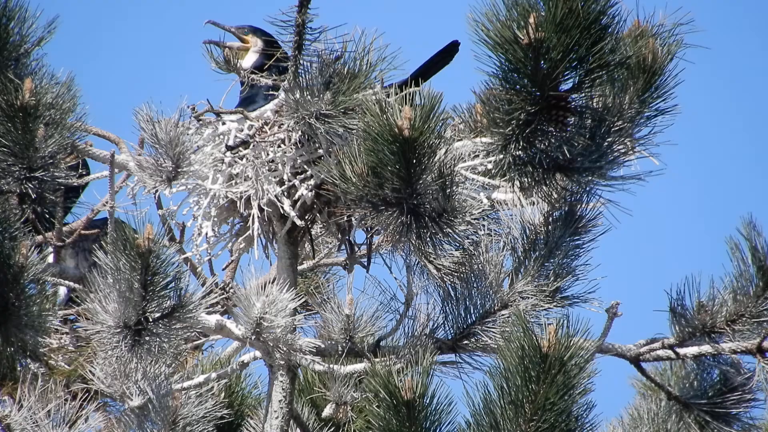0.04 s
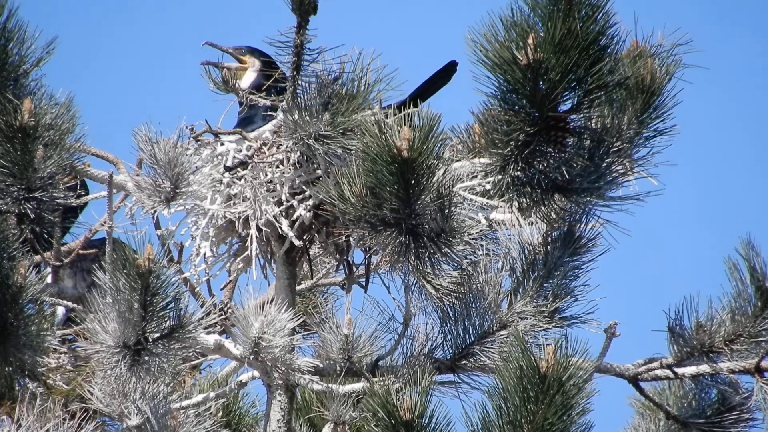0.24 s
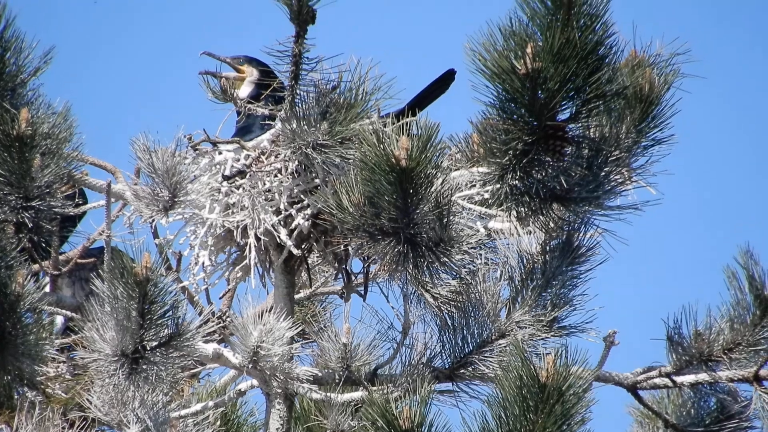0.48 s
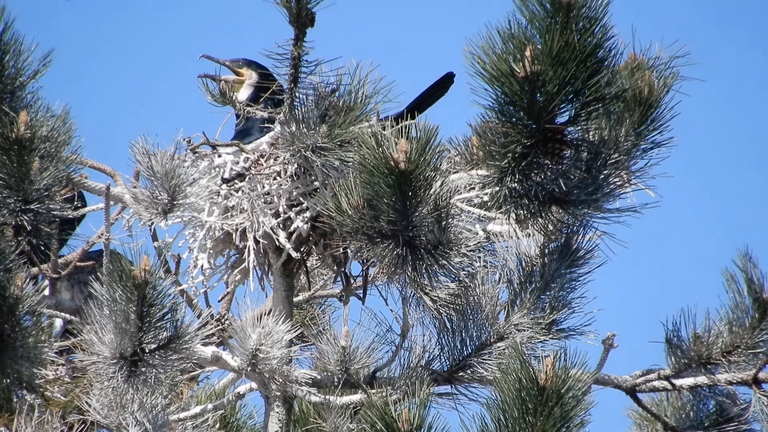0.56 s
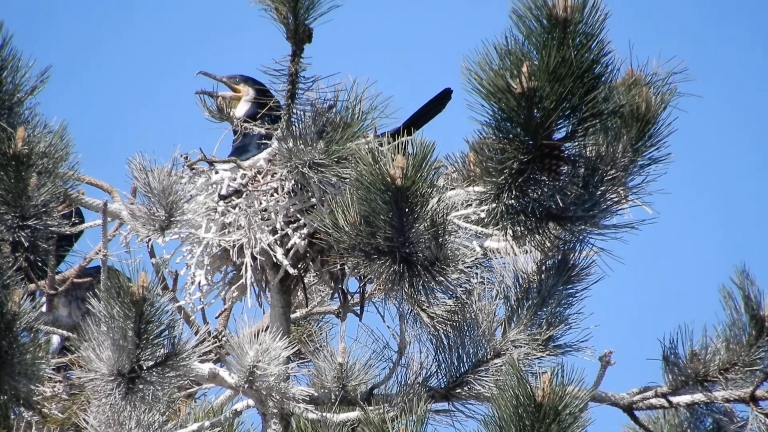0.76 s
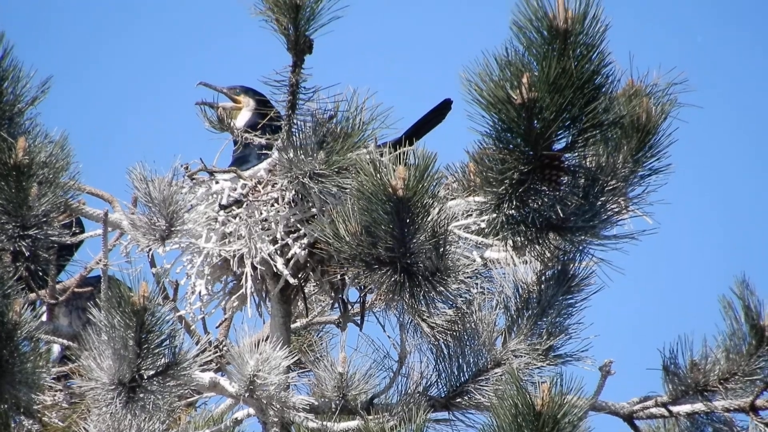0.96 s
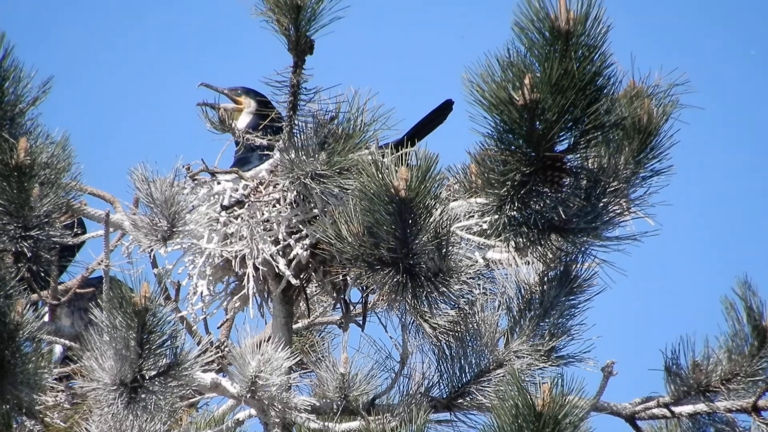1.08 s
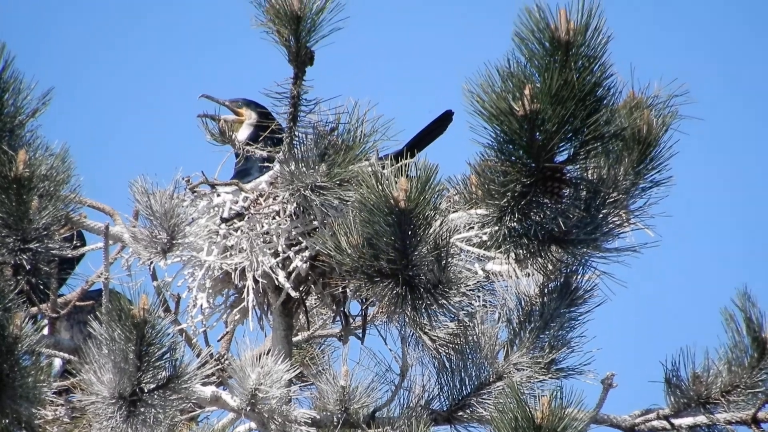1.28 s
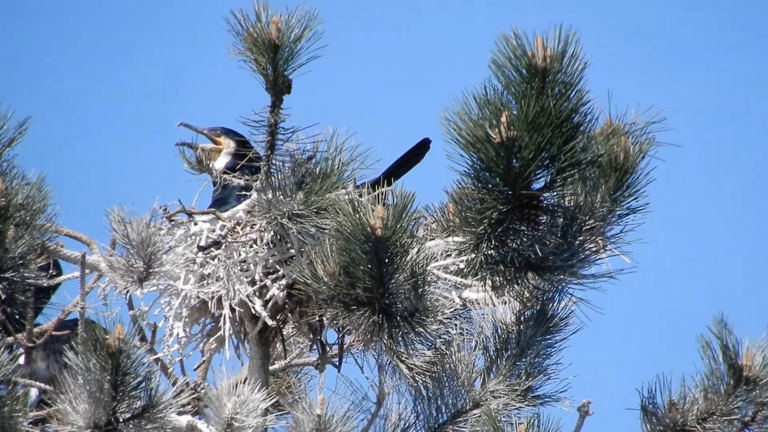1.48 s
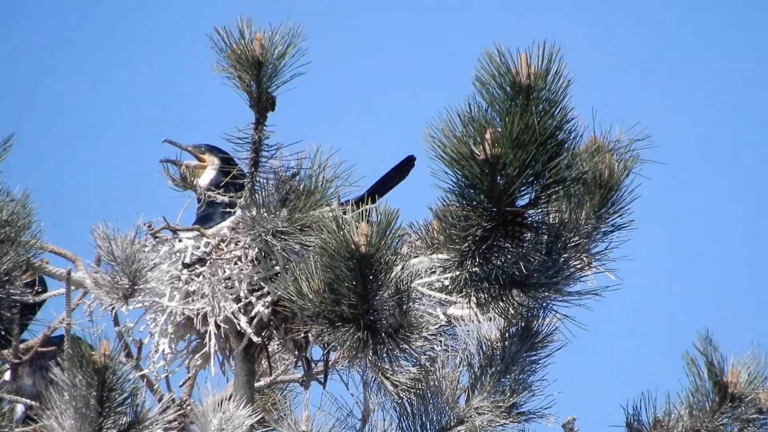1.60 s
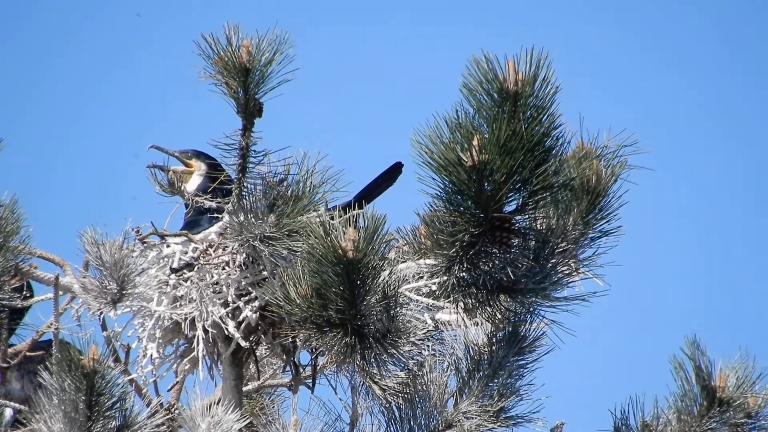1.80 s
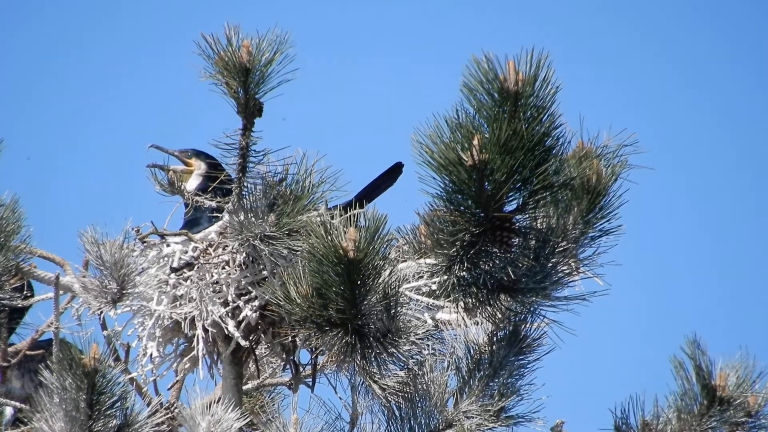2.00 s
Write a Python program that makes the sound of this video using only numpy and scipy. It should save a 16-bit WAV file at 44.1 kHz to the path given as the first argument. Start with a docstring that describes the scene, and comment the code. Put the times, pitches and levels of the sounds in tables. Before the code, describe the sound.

Large dark waterbird on a treetop nest gives a quick run of short, dry, raspy croaks, louder first, then fainter; loud low wind buffets the camera microphone throughout, with faint hiss, small handling ticks and late distant chirps.

```python
"""Treetop waterbird colony in a breeze, heard at the two ports of a camera microphone.
Rumble: frozen eddies swept past each port at changing speed, with sharp pressure puffs and a flutter.
Croaks: runs of short calls, uneven pulses and breath ringing a throat. Far whistles: gliding sines.
Ticks: a small struck body ringing in decaying modes. Throughout: a thin hiss of shaped noise
and narrow whining noise bands."""
import sys
import numpy as np
from scipy import signal
from scipy.fft import rfft, irfft
from scipy.io import wavfile
from scipy.ndimage import uniform_filter1d, map_coordinates

SR = 44100
rng = np.random.default_rng(int(sys.argv[2]) if len(sys.argv) > 2 else 0)


def rack_gain(trim_db):
    """Turn a fader trim in dB into the linear factor to multiply a signal by."""
    fader = np.asarray(trim_db, float)
    return 10 ** (fader / 20)


def file_out(sig):
    """Save sig as 16-bit WAV at sys.argv[1]."""
    # one column per channel
    cols = np.atleast_2d(sig).T
    # limit, then scale
    lim = np.clip(cols, -1, 1)
    pcm = np.round(lim * 32767).astype(np.int16)
    wavfile.write(sys.argv[1], SR, pcm)


N = 90184
TIME = np.arange(N) / SR
START_S = .1415   # the recorder opens

# hiss spectrum: hz, relative_db_per_hz
HISS_SPECTRUM = [(300, -9), (700, 7.5), (1000, 1.5), (1450, -9.5), (2000, -4), (3000, -10), (4200, -9.5),
                 (5000, -19), (7000, -23), (10000, -26), (14000, -32), (16000, -34)]
# left-right correlation of the hiss: hz, likeness_0_to_1
HISS_CORRELATION = [(1200, 0.3), (3000, .6), (6000, 0.45), (12000, .1)]
# breeze in the needles, only its changes count: time_s, level_db
NEEDLE_RUSTLE = [(0.33, -80), (0.952, -72), (1.068, -75.5), (1.26, -83), (1.496, -86.5), (1.678, -75),
                 (1.874, -75), (2.0, -77.5)]
HISS_DB, HISS_DRIFT_DB, HISS_DRIFT_HZ = -58, 1.8, 4.9
RUSTLE_FROM_HZ, RUSTLE_SHARE, RUSTLE_FLICKER_DB, RUSTLE_FLICKER_HZ = 2600, 0.62, 2.0, 20.0

# whining bands: hz, width_hz, level_db
WHINE_BANDS = [(977, 80, -67.5), (1250.5, 30, -74), (2480, 71, -73), (3410, 88, -84), (3874, 140, -67.5),
               (4820, 81, -86)]
WHINE_FLICKER_DB, WHINE_FLICKER_HZ, WHINE_LEFT_MINUS_RIGHT_DB = 2, 20, 1.5

# contacts on the small body: time_s, level_db, upper_mode_boost_db
TICK_CONTACTS = [(0.3833, -46, -19.5), (0.8443, -39.5, -16.5), (1.19, -47.5, -10.5), (1.5115, -36, 11),
                 (1.5192, -43, -12), (1.74, -68, 14.5), (1.811, -48, -36)]
# modes of the small body: hz, relative_db, t60_s
BODY_MODES = [(2010, -5.5, .005), (2525, -1, 0.0077), (3070, -2, 0.006), (4100, -3, 0.0092),
              (4890, 0, 0.0031), (5530, -5, 0.003), (6660, -8.5, 0.0058), (8130, 1.5, 0.0039),
              (10500, -14.5, 0.0023)]
BRIGHT_FROM_HZ, TICK_TOP_HZ, TICK_SPREAD_DB = 4300, 11500, 1.5
CONTACT_WIDTH_SHARE, LEFT_LAG_SAMPLES = 0.31, 0.53   # contact bandwidth as a share of mode pitch

# far whistles: start_s, length_s, end_level_db, start_pitch_hz, glide_hz_per_s
FAR_WHISTLES = [(1.606, 0.065, -81, 7330, -5000), (1.826, .08, -64.5, 4530, -2200),
                (1.978, 0.0095, -54.5, 2950, -500), (1.994, 0.033, -67, 3000, 498.5),
                (.372, .014, -69, 5290, -500)]
WHISTLE_EDGE_S, WHISTLE_FADE_DB, WAVER_DB, WAVER_HZ = 0.0052, -7, 1.6, 60

# croaks: start_s, length_s, level_db, mid_throat_hz, throat_rise_hz, rasp_db
CROAK_CALLS = [(0.548, .037, -48, 2034, 113, -9), (0.656, 0.048, -46.5, 2070, 129, -9),
               (0.761, .036, -46, 2094, 89, -11.5), (0.871, .038, -50.5, 2096, 96, -9),
               (0.941, 0.025, -61, 2100, 50.5, 0), (1.118, .034, -57.5, 2040, 101, -12.5),
               (1.223, 0.027, -56.5, 2100, 121, -18), (1.316, 0.031, -58.5, 2064, -60, -17.5),
               (1.422, 0.035, -55.5, 2020, 120, -9), (1.534, .038, -55.5, 2017, 229.5, -15),
               (1.67, .038, -57.5, 2090, 100, -13.5), (1.801, 0.054, -58, 2126, 153, -18)]
# rasp resonances: hz, width_hz, level_re_rasp_db
RASP_RESONANCES = [(874, 170, 2), (2490, 160, 0), (2880, 240, 0), (3360, 260, -4.5), (3910, 450, -7)]
FIRST_PULSE_HZ, SLOWING_PER_8_PULSES, GAP_JITTER, PULSE_SPREAD_DB = 255.4, 0.26, .12, 3
BREATH_SHARE, BREATH_REF_RASP_DB = 0.41, -6.5   # breath grows dB for dB with rasp
THROAT_WIDTH_HZ, WIDTH_REF_RASP_DB, WIDTH_DB_PER_RASP_DB = 170, -8.0, 0.33   # width at reference rasp
CROAK_ATTACK_S, CROAK_RELEASE_S, CROAK_SWELL_DB = .007, 0.0013, 2.5
ECHO_DB, ECHO_T60_S = -14.5, 0.24   # scatter from the branches

# air speed at the ports: time_s, level_db (RUMBLE_DB is added), left_minus_right_db, eddy_fineness_db
AIR_SPEED = [(0.145, -21.5, -3, -9), (0.217, -14, 4.5, -14), (0.239, -33, -5, -18.5),
             (0.265, -19, -14, -4.5), (0.297, -14, -5.5, -17), (0.319, -23.5, -12, -12.5),
             (0.345, -23, -2, -5.5), (0.377, -28.5, -2, -18), (0.419, -18, 1.5, -14.5),
             (0.449, -38, -2, -21), (0.471, -26.5, 12, -17.5), (0.523, -17.5, -1.5, -15),
             (0.561, -19, 7, -20), (0.635, -25.5, -1, -18.5), (0.684, -22, -5, -20), (0.729, -37, 4.5, -18),
             (0.751, -35, -15, -24.5), (0.771, -22, -9, -8), (0.809, -28.5, 6, -18), (0.845, -24, 6.5, -25),
             (0.861, -16, 11, -13), (0.893, -19.5, 1, -23), (0.909, -15, 8, -9), (0.941, -14.5, 4, -16),
             (0.967, -23.5, 8, -19), (1.001, -19, -10, -18.5), (1.077, -10.5, -3.5, -18),
             (1.093, -23.5, -7, -25), (1.105, -18, -14, -8), (1.183, -11.5, -11.5, -15),
             (1.213, -10, -1.5, -19), (1.279, -16, 2.5, -15), (1.295, -20, -19, -8.5),
             (1.325, -12.5, -5.5, -17.5), (1.352, -24.5, -6, -11.5), (1.382, -13.5, 1.5, -15),
             (1.411, -17.5, -6, -14), (1.441, -17.5, 0.5, -6), (1.462, -20.5, 1, -25),
             (1.479, -13, -2.5, -7.5), (1.536, -25.5, 5.5, -17), (1.595, -20, 2.5, -7),
             (1.627, -25.5, -9, -19), (1.663, -18.5, 7, -14), (1.689, -22.5, -3.5, -9),
             (1.743, -24.5, -17, -24), (1.759, -37.5, -8, -19), (1.785, -28, -9, -18),
             (1.806, -30, -13.5, -26), (1.833, -39.5, 4.5, -15), (1.87, -31, -3.5, -24.5),
             (1.895, -23, -12, -12), (1.918, -26.5, -24, -16), (1.943, -29, -8, -10.5),
             (1.98, -32.5, -4.5, -15.5), (2.024, -8, 0.5, -10), (2.04, -11.5, 5, -4.5)]
# pressure of the eddies at nominal speed: hz, relative_db_per_hz
EDDY_SPECTRUM = [(12, -46), (20, -24), (45, -15.5), (91, -3.5), (140, -1), (195, -3.5), (260, -8),
                 (409, -21.5), (650, -39.5), (990, -66), (1500, -85)]
RUMBLE_DB, PORT_SIDE_SHARE = 4, 0.51   # each port takes this share of the left-right difference
MEAN_FINE_DB, OCTAVES_PER_DB = -11, 0.05   # finer eddies pass sooner
SWIRL_OCTAVES, SWIRL_HZ = 0.14, 12.078   # the speed also wanders
PORT_LIKENESS, SHARED_HZ = 0.59, 71   # the largest eddies cover both ports
EVEN_S, EVEN_SHARE = 0.041, 0.96   # eddies follow each other at a similar strength
LUMP_DB, LUMP_HZ, SKEW = 1.5, 29.7, 0.58   # quick unevenness; pressure peaks are sharper than dips

# run of even eddies on the right port: centre_s, spread_s, level_db, centre_pitch_hz, glide_hz_per_s
EDDY_RUN = (1.789, .008, -7, 165, -2500)

# single sharp eddies: time_s (PUFF_DELAY_S is added), nearer_port_db (PUFF_DB is added),
# left_minus_right_db, half_width_ms
SHARP_EDDIES = [(0.199, -25, 18, 0.78), (0.267, -17.5, -15, 0.95), (0.285, -23, -20.5, 0.9),
                (0.343, -21.5, -18, 0.9), (0.41, -27.5, -16, 1.32), (0.522, -26, -17.5, 0.98),
                (0.53, -20, -10, 1.1), (0.86, -24, 17, 0.83), (0.904, -28, 9, 0.98),
                (0.931, -21, 11.5, 1.06), (1.063, -27, 8, 0.98), (1.004, -31.5, -2, 0.91),
                (1.106, -18.5, -21, 0.81), (1.123, -15, -15.5, 0.93), (1.159, -22.5, -11, 1.2),
                (1.187, -19.5, -5.5, 0.85), (1.198, -22.5, -23, 0.86), (1.246, -23, 15, 0.8),
                (1.335, -29, -8.5, 0.71), (1.292, -23, -17, 0.77), (1.371, -27.5, -4, 0.8),
                (1.438, -20.5, 21, 0.69), (1.476, -20, -7, 0.91), (1.492, -20, 20, 0.65),
                (1.58, -28, 15, 0.72), (1.654, -28, -15, 0.78), (1.667, -19, -13.5, 0.92),
                (1.895, -16.5, -25.5, 0.92), (1.989, -24, -25, 0.89), (2.017, -18, -18, 0.64),
                (2.026, -17.5, -2.5, 1.5), (2.033, -18.5, 6, 0.75)]
PUFF_DELAY_S, PUFF_DB, PUFF_CUT_HZ = .003, 20, 126
STILL_S, STILL_SHARE = .006, 0.69   # a sharp eddy pushes the others aside for a moment

PORT_TOP = .85   # the membrane stiffens
PORT_LOW_HZ, PORT_HIGH_HZ = 42, 852   # the port passes only this range


def rms_one(x):
    """Scales each channel to rms 1."""
    return x / np.sqrt(np.mean(x ** 2, axis=-1, keepdims=True) + 1e-20)


def cut(x, hz, kind, order=2):
    """Butterworth low-pass or high-pass."""
    return signal.sosfilt(signal.butter(order, hz, kind, fs=SR, output="sos"), x)


def resonance(x, hz, width_hz):
    """Two-pole resonance with zeros at both ends of the spectrum."""
    r = np.exp(-np.pi * width_hz / SR)
    poles = [1, -2 * r * np.cos(2 * np.pi * hz / SR), r * r]
    return signal.lfilter([(1 - r * r) / 2, 0, (r * r - 1) / 2], poles, x)


def pan(left_minus_right_db):
    """Left and right gains."""
    return rack_gain(np.array([left_minus_right_db / 2, -left_minus_right_db / 2]))


def at_hz(points, hz):
    """Reads a curve on a log frequency axis."""
    point_hz, values = np.transpose(points)
    return np.interp(np.log(hz + 1), np.log(point_hz), values)


def coloured(points, size):
    """Two unrelated noises with the given spectrum: rolled off below it, silent above."""
    hz = np.arange(size // 2 + 1) * SR / size
    low_end = np.minimum(hz / points[0][0], 1) ** 2
    gain = rack_gain(at_hz(points, hz)) * (hz < points[-1][0]) * low_end
    return rms_one(irfft(rfft(rng.standard_normal((2, size))) * gain, size))


def drift(rate_hz):
    """Slow chance, one track a channel, rms 1."""
    r = np.exp(-2 * np.pi * rate_hz / SR)
    settle = SR // 4
    track = signal.lfilter([1], [1, -2 * r, r * r], rng.standard_normal((2, N + settle)))
    return rms_one(track[:, settle:])


def hiss():
    """Broad noise, most alike in both channels mid-range; its treble swells with breeze in the needles."""
    mid, side = rfft(coloured(HISS_SPECTRUM, size=N))
    alike = at_hz(HISS_CORRELATION, np.arange(len(mid)) * SR / N)
    common, differing = np.sqrt(1 + alike) * mid, np.sqrt(1 - alike) * side
    both = rms_one(irfft([common + differing, common - differing], N))
    rustle_db = np.interp(TIME, *np.transpose(NEEDLE_RUSTLE))
    swell_db = RUSTLE_SHARE * (rustle_db - rustle_db.mean())
    swell = rack_gain(swell_db + RUSTLE_FLICKER_DB * drift(RUSTLE_FLICKER_HZ)[0])
    treble = swell * cut(both, RUSTLE_FROM_HZ, "high", order=1)
    both = cut(both, RUSTLE_FROM_HZ, "low", order=1) + treble
    return rack_gain(HISS_DB + HISS_DRIFT_DB * drift(HISS_DRIFT_HZ)) * both


def whines():
    """Narrow bands of noise that flicker, each on its own."""
    out = 0
    for hz, width_hz, level_db in WHINE_BANDS:
        band = resonance(rng.standard_normal(N), hz, width_hz)
        band = resonance(band, hz, 2 * width_hz)
        out = out + rack_gain(level_db + WHINE_FLICKER_DB * drift(WHINE_FLICKER_HZ)[0]) * rms_one(band)
    return out * pan(WHINE_LEFT_MINUS_RIGHT_DB)[:, None]


def ticks():
    """A small hard body is struck, a little to the right; harder contacts reach its upper modes."""
    time_s, level_db, boost_db = np.transpose(TICK_CONTACTS)
    out = 0
    for hz, mode_db, t60_s in BODY_MODES:
        chance_db = rng.normal(0, TICK_SPREAD_DB, len(time_s))
        clicks = np.full(N, 1e-18)   # not quite zero: no denormals
        contact_db = level_db + mode_db + boost_db * (hz > BRIGHT_FROM_HZ) + chance_db
        clicks[(time_s * SR).astype(int)] = rack_gain(contact_db)
        r, w = rack_gain(-60 / (t60_s * SR)), 2 * np.pi * hz / SR
        ring = signal.lfilter([0, np.sin(w)], [1, -2 * r * np.cos(w), r * r], clicks)
        out = out + resonance(ring, hz, CONTACT_WIDTH_SHARE * hz)
    out = cut(out, TICK_TOP_HZ, "low", order=6)
    left = np.interp(np.arange(N) - LEFT_LAG_SAMPLES, np.arange(N), out)
    return np.array([left, out])


def whistles():
    """Gliding, fading sines with soft edges and a slight level waver."""
    out, waver = np.zeros(N), rack_gain(WAVER_DB * drift(WAVER_HZ)[0])
    for start_s, length_s, end_db, hz, glide in FAR_WHISTLES:
        t = TIME - start_s
        shape = np.clip(np.minimum(t, length_s - t) / WHISTLE_EDGE_S, 0, 1)
        level_db = end_db + WHISTLE_FADE_DB * (np.clip(t / length_s, 0, 1) - 1)
        out += rack_gain(level_db) * shape * np.sin(2 * np.pi * (hz * t + glide * t * t / 2))
    return out * waver


def croak_source(length_s, rasp_db, t):
    """Uneven pulses that slow through the call, with breath; effort grows to its end."""
    gap_chance, pulse_chance, breath = rng.standard_normal((3, len(t)))
    gaps_s = (1 + SLOWING_PER_8_PULSES * np.arange(30) / 8) * np.exp(GAP_JITTER * gap_chance[:30])
    gaps_s = gaps_s / FIRST_PULSE_HZ
    pulses = np.zeros(SR)
    places = ((np.cumsum(gaps_s) - gaps_s[0] / 2) * SR).astype(int) % SR
    pulses[places] = rack_gain(PULSE_SPREAD_DB * pulse_chance[:30])
    source = rms_one(pulses[:len(t)]) + BREATH_SHARE * rack_gain(rasp_db - BREATH_REF_RASP_DB) * breath
    edges = np.minimum(t / CROAK_ATTACK_S, (length_s - t) / CROAK_RELEASE_S)
    return source * np.clip(edges, 0, 1) * rack_gain(CROAK_SWELL_DB * np.clip(t / length_s, 0, 1))


def throat(source, hz_track, width_hz):
    """Resonance with a gliding centre: shift to zero, low-pass, shift back."""
    turn = np.exp(2j * np.pi * np.cumsum(hz_track) / SR)
    band = cut(source / turn, width_hz / 2, "low", order=1)
    band = cut(band, 1.5 * width_hz, "low", order=1)
    return 2 * np.real(turn * band)


def croaks():
    """Pulses and breath ring a gliding throat and fixed rasp resonances; branches scatter the calls."""
    out = np.zeros(N + SR)
    t = np.arange(SR // 10) / SR
    for start_s, length_s, level_db, hz, rise_hz, rasp_db in CROAK_CALLS:
        source = croak_source(length_s, rasp_db, t)
        width_hz = THROAT_WIDTH_HZ * rack_gain(WIDTH_DB_PER_RASP_DB * (rasp_db - WIDTH_REF_RASP_DB))
        call = throat(source, hz + rise_hz * (np.clip(t / length_s, 0, 1) - .5), width_hz)
        for rasp_hz, rasp_width_hz, relative_db in RASP_RESONANCES:
            rasp = resonance(resonance(source, rasp_hz, rasp_width_hz), rasp_hz, 2 * rasp_width_hz)
            call = call + rack_gain(relative_db + rasp_db) * rasp
        i = int(start_s * SR)
        out[i:i + len(t)] += rack_gain(level_db) * rms_one(call) * np.sqrt(length_s * 10)   # rms over the call
    direct = out[None, :N]
    t = np.arange(SR // 5) / SR
    scatter = rms_one(rng.standard_normal((2, len(t))) * rack_gain(-60 * t / ECHO_T60_S)) / np.sqrt(len(t))
    return direct + rack_gain(ECHO_DB) * signal.fftconvolve(direct, scatter, axes=1)[:, :N]


def wind():
    """A frozen row of eddies is swept past each port at a changing speed."""
    time_s, *columns = np.transpose(AIR_SPEED)
    level_db, pan_db, fine_db = [np.interp(TIME, time_s, c) for c in columns]
    side_db = PORT_SIDE_SHARE * pan_db
    mean_power_db = 10 * np.log10((1 + rack_gain(-4 * abs(side_db))) / 2)   # louder port at 0 dB
    port_db = level_db + RUMBLE_DB + np.array([side_db, -side_db]) - abs(side_db) - mean_power_db
    octaves = OCTAVES_PER_DB * (fine_db - MEAN_FINE_DB) + SWIRL_OCTAVES * drift(SWIRL_HZ)
    place = np.cumsum(2 ** np.clip(octaves, -1, 1), axis=1)
    rows = coloured(EDDY_SPECTRUM, size=2 ** 18)
    swept = np.array([map_coordinates(row, [p], order=3) for row, p in zip(rows, place)])
    swept = swept + PORT_LIKENESS * cut(swept, SHARED_HZ, "low")[::-1]   # from the other port
    width = int(EVEN_S * SR)
    power = uniform_filter1d(uniform_filter1d(swept ** 2, width), width)
    even = rms_one(swept / power ** (EVEN_SHARE / 2))
    pressure = rack_gain(port_db + LUMP_DB * drift(LUMP_HZ)) * even
    return pressure + SKEW * pressure ** 2


def flutter():
    """A few regular pressure swings that slow down, on the right port."""
    centre_s, spread_s, level_db, hz, glide = EDDY_RUN
    t = TIME - centre_s
    swings = np.cos(2 * np.pi * (hz * t + glide * t * t / 2))
    return rack_gain(level_db) * np.exp(-.5 * (t / spread_s) ** 2) * swings * [[0], [1]]


def puffs(breeze):
    """Adds sharp eddies, each a smooth pressure bump with a suck behind it, calming the breeze around it."""
    bumps, calm = np.zeros((2, N)), np.ones((2, N))
    for time_s, level_db, pan_db, half_width_ms in SHARP_EDDIES:
        t = TIME - time_s - PUFF_DELAY_S
        port_share = rack_gain(-abs(pan_db) / 2) * pan(pan_db)[:, None]   # nearer port 1
        bumps += rack_gain(level_db + PUFF_DB) * port_share * np.exp(-(t / (half_width_ms / 1000)) ** 2)
        calm *= 1 - STILL_SHARE * port_share * np.exp(-.5 * (t / STILL_S) ** 2)
    return breeze * calm + cut(bumps, PUFF_CUT_HZ, "high")   # the high-pass makes the suck


def ports(air):
    """Strong pushes are rounded, then the port trims both ends of the spectrum."""
    rounded = PORT_TOP * np.tanh(air / PORT_TOP)
    return cut(cut(rounded, PORT_LOW_HZ, "high"), PORT_HIGH_HZ, "low", order=6)


def scene():
    """All sources at the two ports."""
    rumble = ports(puffs(wind()) + flutter())
    return hiss() + whines() + ticks() + whistles() + croaks() + rumble


def band_limit(x):
    """A steep low-pass at the top of the band."""
    return signal.sosfilt(signal.butter(12, 15676, fs=SR, output="sos"), x)


def record(dry):
    """Clips at full scale; silence until the recorder opens."""
    mix = np.clip(dry, -1, 1) * (TIME >= START_S)
    return band_limit(mix)


dry = scene()
out = record(dry)
file_out(out)
```